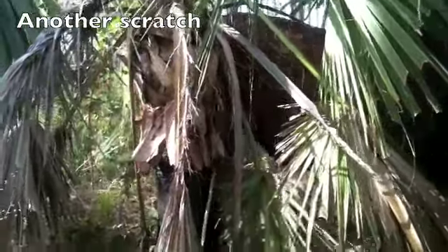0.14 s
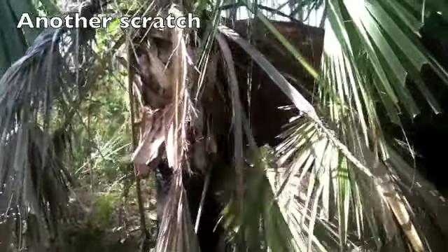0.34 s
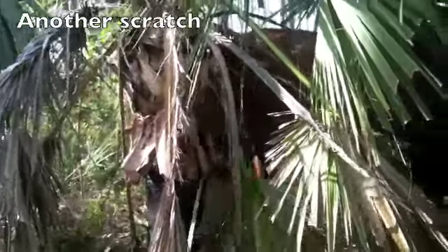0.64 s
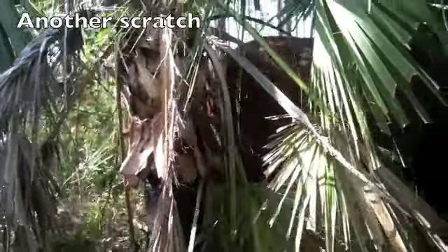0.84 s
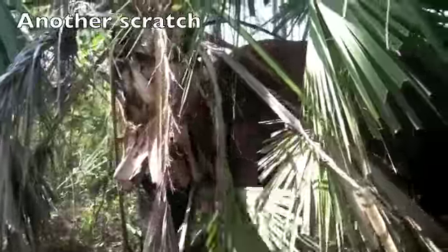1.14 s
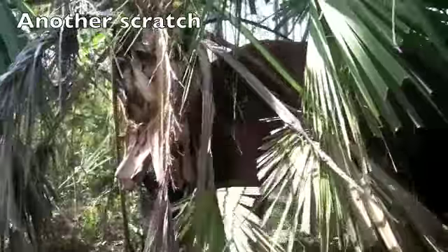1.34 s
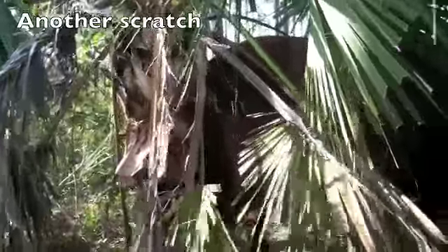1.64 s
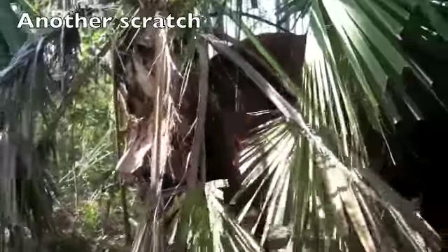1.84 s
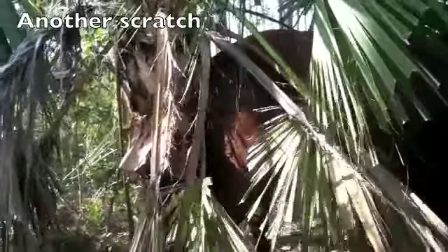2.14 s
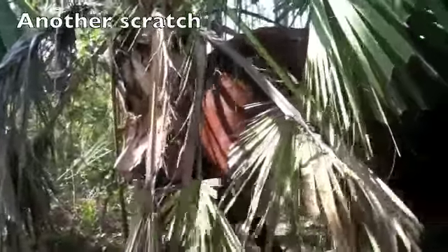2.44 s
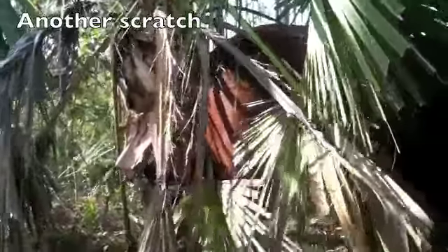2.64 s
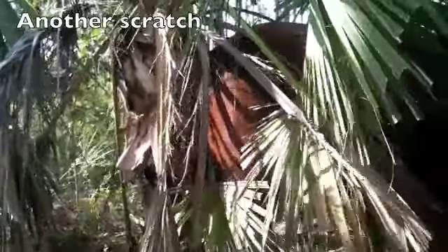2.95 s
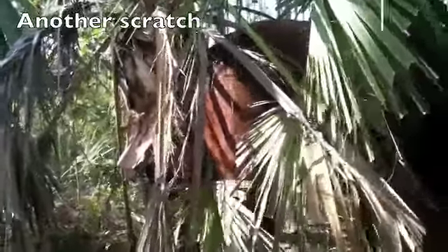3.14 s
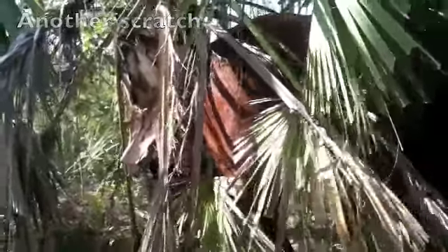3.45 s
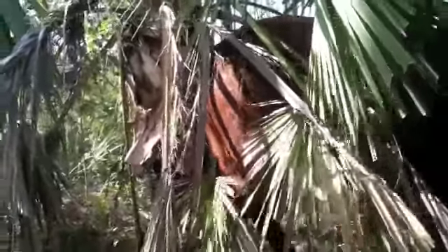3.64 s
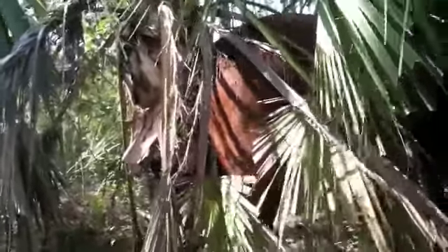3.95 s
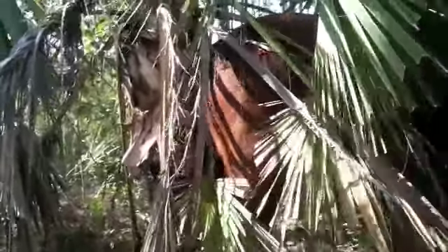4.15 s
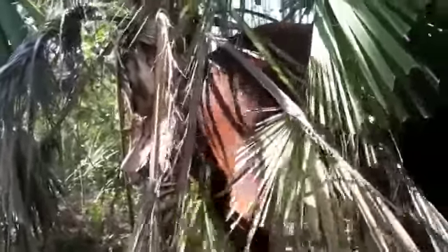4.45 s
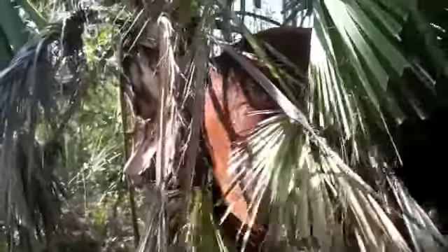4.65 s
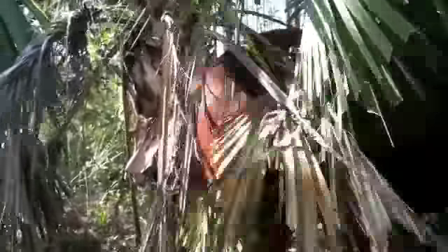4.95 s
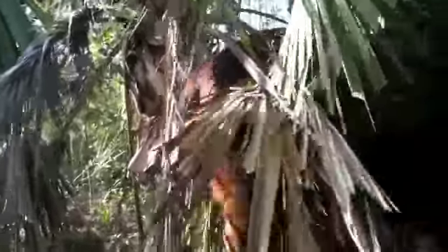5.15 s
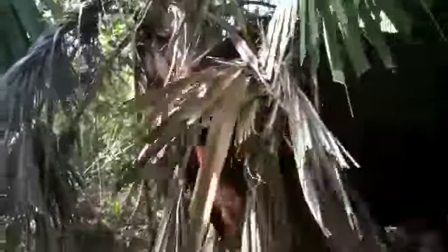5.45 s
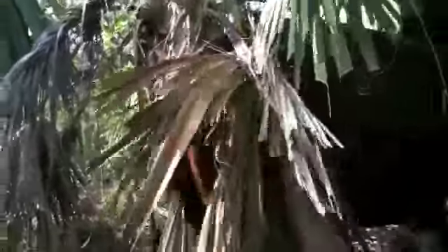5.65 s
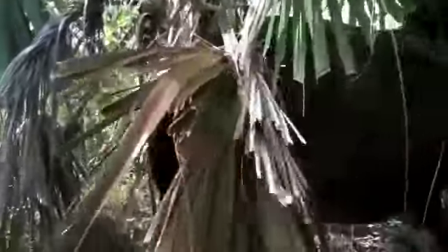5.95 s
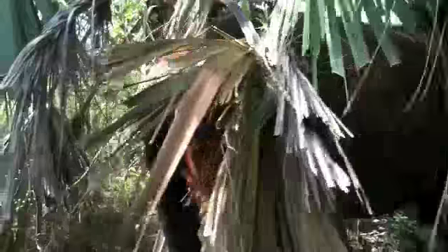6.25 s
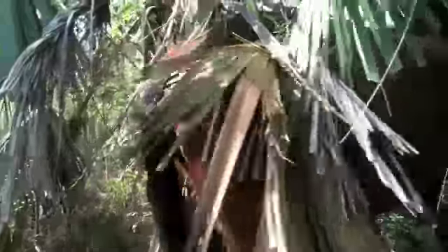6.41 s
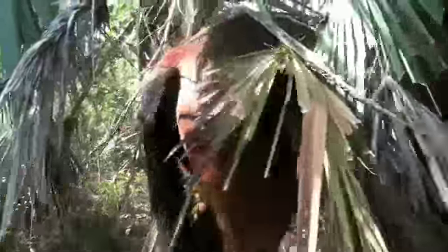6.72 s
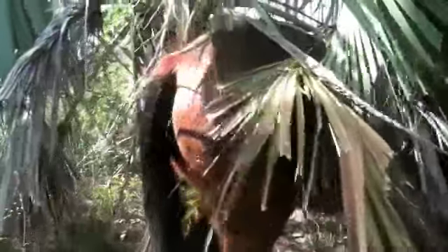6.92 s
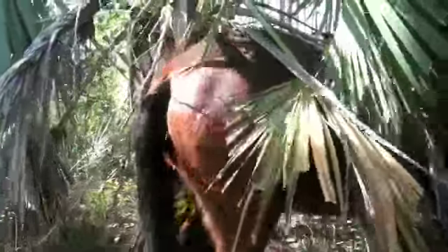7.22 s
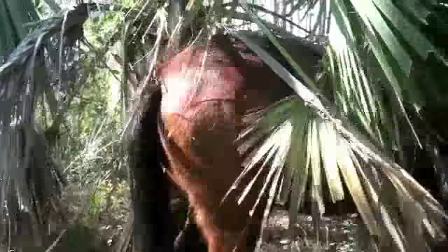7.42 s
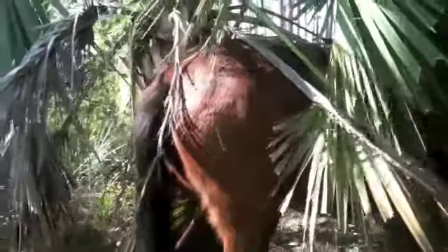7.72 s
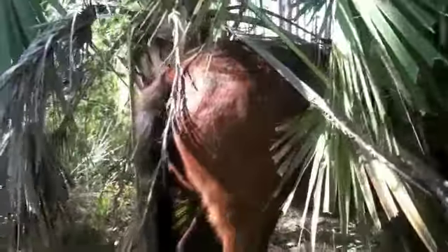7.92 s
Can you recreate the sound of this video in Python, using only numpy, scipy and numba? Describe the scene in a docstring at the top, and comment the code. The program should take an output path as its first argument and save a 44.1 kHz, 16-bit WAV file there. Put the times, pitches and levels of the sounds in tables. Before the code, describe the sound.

Crisp, bright rustling of dry palm leaves comes in repeated strokes, with sharp crackling snaps and a few faint hollow stalk knocks outdoors.

```python
"""In a wood, a few metres from a small camera microphone, a large animal rubs against dry palm fronds.
Stiff leaflets scrape and tick, and their ribs rasp lower: thousands of short ringing noise grains.
Single leaflets snap: a faint creak, a sharp break and a dying crackle.
Hollow stalks knock together: one dry tick, a low ring and a thud.
A faint woodland hush of filtered noise lies underneath."""
import sys
import numpy as np
from scipy import signal
from scipy.fft import rfft, irfft
from scipy.io import wavfile
from scipy.ndimage import uniform_filter1d
from numba import njit

SR = 44100
rng = np.random.default_rng(int(sys.argv[2]) if len(sys.argv) > 2 else 0)


def unload_audio(sound):
    """Save the sound as a 16-bit wav file, at the path given as the first command line argument."""
    columns = np.transpose(np.atleast_2d(sound))
    # keep every value between -1 and 1, then stretch to whole-number steps
    steps = np.round(np.clip(columns, -1, 1) * 32767)
    wavfile.write(sys.argv[1], SR, steps.astype(np.int16))


N = 356107  # length of the scene in samples
LEAD_S = 0.008  # a snap or knock burst starts this long before its strike


def undb(db):
    """Turn a level in dB into a gain."""
    return 10 ** (np.asarray(db) / 20)


def unit(x):
    """Scale a sound to rms 1."""
    return x / np.sqrt(np.mean(x ** 2))


def along(table):
    """Join each column of a table by straight lines in time; the first column is time in s."""
    time_s, *columns = np.transpose(table)
    t = np.arange(N) / SR
    return [np.interp(t, time_s, column) for column in columns]


def walk(rate_hz, size):
    """A random level that moves to a new value rate_hz times a second; its spread is near 1."""
    hold = max(int(SR / rate_hz), 1)
    steps = np.repeat(rng.standard_normal(size // hold + 1), hold)
    return 1.12 * uniform_filter1d(steps, hold)[:size]


def colour(x, points):
    """Filter a sound through (pitch_hz, gain_db) points, with no sound ahead of its cause."""
    pitch_hz, gain_db = np.transpose(points)
    size = 2048
    log_grid = np.log(np.arange(1, size // 2 + 2) * SR / size)
    log_gain = np.interp(log_grid, np.log(pitch_hz), gain_db) * np.log(10) / 20
    # folding the cepstrum of the log gain gives a filter that only looks back
    cepstrum = irfft(log_gain)
    cepstrum[1:size // 2] *= 2
    cepstrum[size // 2 + 1:] = 0
    response = irfft(np.exp(rfft(cepstrum)))
    return signal.fftconvolve(x, response)[:len(x)]


def low_pass(x, cutoff_hz):
    """Gently remove what lies above cutoff_hz."""
    return signal.sosfilt(signal.butter(1, cutoff_hz, fs=SR, output="sos"), x)


def band(x, centre_hz, octaves):
    """Keep a band reaching the given octaves either side of its centre, and scale it to peak 1."""
    edges = np.clip([centre_hz * 2 ** -octaves, centre_hz * 2 ** octaves], 20, 0.45 * SR)
    y = signal.sosfilt(signal.butter(1, edges, "band", fs=SR, output="sos"), x)
    return y / np.abs(y).max()


def band_twice(x, centre_hz, octaves):
    """Apply the same band two times for steeper sides."""
    return band(band(x, centre_hz, octaves), centre_hz, octaves)


def add(out, start_s, x):
    """Mix x into out from start_s."""
    i = int(start_s * SR)
    out[i:i + len(x)] += x[:max(N - i, 0)]


# Tone of the woodland hush: (pitch_hz, gain_db)
HUSH_TONE = [(24, -69), (40, -34), (291, -5), (439, -6), (886, -8.5), (1510, -13), (1920, -10.5),
             (3430, -18.5), (5850, -8.5), (13000, -18.5)]


def hush():
    """The quiet of the wood: steady coloured noise whose level drifts a little."""
    level_db = -59.5 + 1.6 * walk(6, N)
    return undb(level_db) * unit(colour(rng.standard_normal(N), HUSH_TONE))


def burst(fall_db, strike_db, chatter_db, chatter_rate_hz, creak_db):
    """A faint creak, a sharp strike, then noise dying by fall_db per 10 ms in uneven after-slips."""
    size = 4096
    t = np.arange(size) / SR - LEAD_S  # the strike is at 0 s
    # at least 2 dB per 10 ms; the creak swells 1.5 times as steeply as the noise dies
    fade_db = -100 * max(fall_db, 2) * np.abs(t) * np.where(t < 0, 1.5, 1)
    slips_db = fade_db + chatter_db * walk(chatter_rate_hz, size)
    strike = 1 + undb(strike_db) * np.exp(-np.abs(t) / 0.0018)
    shape = np.where(t < 0, undb(creak_db), strike)
    return rng.standard_normal(size) * undb(slips_db) * shape


# Stalks knocking together:
# (start_s, level_db, pitch_hz, fall_db per 10 ms, tick_db above the ring, thud_db above the ring)
STALK_KNOCKS = [(.122, -46, 840, 18, 6, -25), (.169, -37, 400, 8, -1, -33), (0.225, -39, 323, 11, 2, -28),
                (.371, -46.5, 200, 13.5, 13.5, -6), (.621, -36.5, 270, 7.5, 3, -11),
                (2.587, -48, 265, 4.5, 8, -28), (3.237, -39, 806, 4, -8, -30),
                (3.413, -38, 885, 9, -11, -29), (3.48, -51, 370, 9, -4, -9), (3.8, -47.5, 270, 3.5, 2, -10),
                (3.89, -53, 280, 9, 10, -22), (4.275, -51, 420, 7, 9, -12), (4.701, -49.5, 155, 10, 2, -12),
                (4.778, -40.5, 840, 1.5, 8, -11), (6.633, -41, 275, 4, 3, -18),
                (6.945, -41, 1190, 5, 17.5, -15), (7.749, -45, 724, 8, 2, -17)]


def knocks():
    """A hollow stalk rings low after one dry, woody tick; the trunk thuds beneath."""
    out = np.zeros(N)
    t = np.arange(4096) / SR
    pulse = np.exp(-(t / 0.00017 - 2) ** 2)
    tick = band(band(pulse, 960, 1.0), 930, 1.6)
    # the hollow takes a moment to speak
    swell = 1 - np.exp(-np.maximum(t - LEAD_S, 0) / 0.0028)
    for start_s, level_db, pitch_hz, fall_db, tick_db, thud_db in STALK_KNOCKS:
        blow = swell * burst(fall_db, strike_db=3.0, chatter_db=2.5, chatter_rate_hz=150, creak_db=-30)
        blow[int(LEAD_S * SR)] -= 10  # the blow itself sets the hollow going at once
        ring = band(band(blow, pitch_hz, 0.37), pitch_hz, 0.42)
        thud = band_twice(blow, 160, 0.38)
        add(out, start_s - LEAD_S, undb(level_db) * (ring + undb(thud_db) * thud))
        add(out, start_s, -undb(level_db + tick_db) * tick)
    return out


# Tone of the dry leaflets: (pitch_hz, gain_db)
LEAFLET_TONE = [(1530, -42.5), (2600, -16), (3260, -11), (5700, -0.5), (7950, 0), (9670, -4.5),
                (11700, -10), (15100, -26.5), (15800, -19.5)]


def leaflet_colour(x):
    """Stiff, thin leaflets pass on mostly treble."""
    return colour(x, LEAFLET_TONE)


# Loud leaflet snaps: (start_s, level_db, pitch_hz, fall_db per 10 ms,
#                      body_db of the dull body, creak_db of the creak before)
LEAFLET_SNAPS = [(0.1551, -20.5, 6260, 12, -11, -16), (0.222, -21, 7600, 12, -11, -12),
                 (0.5964, -23, 7400, 3.5, -24, -17), (0.617, -18, 7060, 8, -18, -10),
                 (0.645, -22, 6400, 0.5, -13, 0), (0.804, -26.5, 6040, 4, -13, -10),
                 (1.065, -28, 7500, 7.5, -4, -10), (1.133, -22.5, 5900, 0, -7, -4),
                 (1.352, -24, 6060, 1, -20, 2), (1.378, -21, 7600, 7, -20, -8),
                 (1.4878, -24, 6800, 11, -19, -14), (2.095, -32, 7000, 19, -20, -18),
                 (2.123, -28.5, 6040, 10, -17, -8), (2.19, -32, 7200, 9, -20, -18),
                 (2.2386, -25.5, 5500, 14, -11, 6), (2.4238, -25.5, 5530, 11, -21, -10),
                 (2.4758, -28, 4830, 13, -21, -12), (2.7156, -26, 7400, 2.5, -11.5, -7),
                 (2.781, -26.5, 6450, 1, -21, 1), (2.806, -19, 8000, 7, -15, -18),
                 (2.9414, -16.5, 6650, 8, -19, -8), (3.029, -34, 5640, 10, -19, -12),
                 (3.067, -25.5, 5400, 3, -16, -5), (3.145, -17.5, 5900, 9, -21, -22),
                 (3.176, -17, 5700, 0.5, -19, 1), (3.2353, -18, 6160, 0.5, -16.5, -2),
                 (3.26, -18, 5940, 11, -22, -10), (3.398, -21, 6050, 16, -17, -16),
                 (3.4158, -14, 6000, 21, -10.5, -12), (3.476, -24, 6360, 17, -17, -6),
                 (3.494, -26, 5000, 18, -16, -14), (3.612, -25, 6460, 5, -20, -10),
                 (4.272, -31, 5990, 4, -5, -14), (4.304, -27, 5280, 12, -14, -10),
                 (4.326, -18.5, 6040, 11, -23, -14), (4.35, -24.5, 7600, 1, -14, -16),
                 (4.577, -28, 6860, 14, -21, -10), (4.5891, -17, 6900, 11, -17, -7),
                 (4.783, -20, 6440, 4, -10.5, -12), (4.806, -22, 6300, 5, -20, -10),
                 (4.902, -16, 6100, 11, -12, -2), (4.9319, -23, 6790, 5.5, -15, -11),
                 (4.971, -37, 2540, 18, -6, -3), (5.148, -24, 6100, 20, -14, -12),
                 (5.21, -20, 7800, 15, -11.5, -14), (5.221, -18, 8850, 16, -15, -8),
                 (5.242, -17, 8400, 16, -18, -14), (5.266, -25.5, 8300, 14, -8, -12),
                 (5.284, -27, 8270, 16, -14, -4), (5.304, -29, 7000, 8, -3, -6),
                 (5.3298, -23, 6500, 15, -19, -8), (5.358, -25.5, 2450, 13, -16, -22),
                 (5.376, -21.5, 8450, 19, -14, -6), (5.401, -25, 6600, 8, -8.5, -12),
                 (5.5209, -15, 4980, 13, -17.5, -16), (5.552, -24, 4810, 10, -13, -8),
                 (5.58, -21.5, 8040, 13, -16, -16), (5.597, -24, 5800, 12, -18, -8),
                 (5.613, -22, 2150, 10, -14, -18), (5.623, -20.5, 8000, 7, -11, -2),
                 (5.6555, -12, 7800, 28, -12.5, -26), (5.689, -25, 2540, 9, -13, 0),
                 (5.753, -20.5, 6540, 12, -15, -14), (5.7593, -14, 5130, 18, -19, -2),
                 (5.77, -23.5, 6500, 21, -13, -12), (5.9656, -12.5, 4620, 22, -20, -26),
                 (5.974, -18.5, 4600, 10, -12, -20), (5.979, -26.5, 3360, 12, -10, -20),
                 (6.161, -31.5, 6230, 16, -10, -12), (6.197, -30, 7360, 3.5, -21, 0),
                 (6.226, -35, 7500, 12, -1.5, -12), (6.26, -27.5, 4570, 5, -6.5, 0),
                 (6.3184, -21, 7160, 15, -13, -20), (6.37, -29, 7050, 5, -17, -10),
                 (6.576, -17, 5000, 12, -17.5, -13), (6.59, -30, 4300, 14, -17, -4),
                 (6.614, -22, 6230, 12, -7, -13), (6.662, -24.5, 7000, 10, -11, -3),
                 (6.676, -27, 5440, 17, -4.5, -8), (6.696, -29, 5500, 13, -9, -8),
                 (6.744, -30, 7350, 12, -18, -11), (6.7998, -17, 4520, 14, -20, -5),
                 (6.822, -21.5, 9300, 18, -16, -14), (6.835, -21, 4700, 5, -9, -1),
                 (6.859, -23.5, 6300, 14, -12, -5), (6.928, -21.5, 5090, 14, -13, -5),
                 (6.9446, -24, 5080, 9, -4.5, -12), (6.998, -26.5, 7500, -1, -5.5, -2),
                 (7.014, -27, 6200, 10.5, -12, -12), (7.0367, -22.5, 5200, 10, -10, -12),
                 (7.087, -27, 6500, 16, -6, 0), (7.1203, -20.5, 6000, 13, -9, 7),
                 (7.156, -29, 7900, 6, -7, -8), (7.175, -18, 7750, 4, -11.5, -1),
                 (7.193, -22, 7500, 14, -13, -10), (7.2454, -11.5, 7600, 6.5, -11, -18),
                 (7.322, -18, 8240, 4, -8, -12), (7.337, -24.5, 2800, 4, -7, -8),
                 (7.4087, -17, 5670, 9, -9, -13), (7.435, -19.5, 6030, 17, -11, -1),
                 (7.488, -27, 7800, 12, -22, -8), (7.5106, -23.5, 7600, 3, -11.5, -10),
                 (7.637, -24, 5100, 20, -5.5, -7), (7.695, -23, 6750, 2.5, -10, -17),
                 (7.75, -19, 7200, 9, -6.5, -7), (7.8503, -27, 5400, 20, -7.5, -12),
                 (7.9078, -27.5, 5700, 14, -12, -12), (7.952, -28.5, 6700, 8, -10, -4)]


def snaps():
    """A bent leaflet creaks, then lets go: its own ring, a broad crackle, a dull body, a brittle top."""
    out = np.zeros(N)
    for start_s, level_db, pitch_hz, fall_db, body_db, creak_db in LEAFLET_SNAPS:
        crack = burst(fall_db, strike_db=3.5, chatter_db=2.0, chatter_rate_hz=572, creak_db=creak_db)
        # a leaflet that creaks little breaks hard
        crack[int(LEAD_S * SR)] += 1.7 * undb(-0.35 * (creak_db + 17))
        ring = band(band(crack, pitch_hz, 0.14), pitch_hz, 0.74)
        crackle = band(leaflet_colour(crack), 6800, 0.78)
        body = band_twice(crack, 2410, 0.81)
        brittle = band_twice(crack, 10950, 0.35)
        snap = 0.71 * ring + 0.57 * crackle + undb(body_db) * body + undb(-21) * brittle
        add(out, start_s - LEAD_S, undb(level_db) * snap)
    return out


@njit
def grains(at, size, hz, sharp, t60_s, noise):
    """Each grain is a dying burst of noise through its own resonance."""
    out = np.zeros(len(noise))
    for j in range(len(at)):
        tuning = np.tan(np.pi * hz[j] / SR)
        damping = 1 / sharp
        fall = np.exp(-np.log(1000) / (t60_s[j] * SR))
        band_state, low_state, force = 0., 0., size[j]
        # stop once the noise has fallen by 36 dB
        stop = min(len(out), at[j] + int(t60_s[j] * SR * .6))
        for i in range(at[j], stop):
            push = force * noise[i - j] - low_state
            ring = (band_state + tuning * push) / (1 + tuning * (tuning + damping))
            band_state = 2 * ring - band_state
            low_state += 2 * tuning * ring
            force *= fall
            out[i] += ring * np.sqrt(damping / tuning)
    return out


def scrape(low_hz, high_hz, sharp, base_t60_s, spread_db, grip, count):
    """Slips between surfaces: many small, a few large, stronger or weaker as the grip changes."""
    when, big, pitch, length = rng.random((count, 4)).T
    at = (when * N).astype(np.int64)
    size = undb(-spread_db * np.log(1 - 0.995 * big)) * grip[at]
    hz = low_hz + (high_hz - low_hz) * pitch
    t60_s = base_t60_s * (1.34 + 1.83 * length)
    return grains(at, size, hz, sharp, t60_s, rng.standard_normal(N))


# Edge ticks grow stronger as drier leaflets join in: (start_s, level_db against the leaflet scrape)
EDGE_TICKS = [(.8, -11.5), (4.6, -9)]


def leaflets(grip, treble_db):
    """Leaflets scrape in dense grains; their brittle edges add sparse, very short ticks."""
    leaf = unit(leaflet_colour(scrape(2590.0, 14400.0, 2.54, 0.014, 2.42, grip, count=20000)))
    ticks = unit(leaflet_colour(scrape(4400.0, 15800.0, 2.1, 0.004, 3.9, grip, count=3000)))
    dull = low_pass(leaf, 10000)
    tick_db, = along(EDGE_TICKS)
    return dull + undb(treble_db) * (leaf - dull) + undb(tick_db) * ticks


# Tone of the leaflet ribs: (pitch_hz, gain_db)
RIB_TONE = [(35, -59), (60, -34), (265, -7.5), (348, -5), (398, -10.5), (895, -4), (1560, -4.5),
            (2430, -2.5), (3070, -5), (3400, -6.5), (4420, -2.5), (7480, -120)]


def ribs(grip, rib_db):
    """Ribs rasp lower; the heavy stalks answer a hard stroke less than the light ribs do."""
    rib = unit(colour(scrape(63.0, 3640.0, 2.26, 0.029, 3.25, grip, count=16000), RIB_TONE))
    stalk = low_pass(rib, 700)
    return rib - stalk + undb(-0.3 * (rib_db + 45.5)) * stalk


# Strokes of the flank along the fronds:
# (start_s of full pressure, held_s, first_db of the leaflets on arrival, last_db on leaving)
FLANK_STROKES = [(0.0, 0.455, -42.5, -39), (0.48, 0.23, -39.5, -43.5), (1.1, 0.21, -35, -40.5),
                 (1.345, 0.07, -38, -33.5), (1.41, 0.14, -37, -38.5), (1.69, 0.048, -43, -46.5),
                 (2.25, 0.18, -43.5, -42), (2.55, .24, -43, -44.5), (3.15, 0.26, -37, -33),
                 (3.59, .02, -40.5, -42), (3.68, 0.13, -45.5, -44.5), (4.11, .04, -45, -45),
                 (4.33, .08, -38, -40), (4.435, 0.04, -37.5, -32), (4.49, 0.032, -34, -35.5),
                 (4.55, 0.24, -39.5, -46.5), (4.8, .32, -35, -38), (5.18, 0.21, -38, -39),
                 (5.45, 0.089, -38, -40.5), (5.61, 0.074, -35.5, -33.5), (5.73, 0.032, -37, -40),
                 (6.21, 0.035, -45, -46), (6.32, 0.11, -46, -45), (6.51, 0.27, -38.5, -35.5),
                 (6.83, .33, -40, -39.5), (7.2, 0.14, -38, -30.5), (7.37, 0.13, -34.5, -40),
                 (7.54, 0.1, -41.5, -44), (7.71, 0.047, -40, -43.5), (7.93, .04, -46.5, -47.5)]


def stroke_level_db():
    """Each stroke bites, drags and eases off; the strongest at any moment sets the rustle."""
    press_db_per_s, ease_db_per_s, rest_db = 110, 117, -50.5
    t = np.arange(N) / SR
    out = np.full(N, rest_db)
    for start_s, held_s, first_db, last_db in FLANK_STROKES:
        end_s = start_s + held_s
        drag = np.interp(t, [start_s, end_s], [first_db, last_db])
        bite = press_db_per_s * np.maximum(start_s - t, 0)
        ease = ease_db_per_s * np.maximum(t - end_s, 0)
        out = np.maximum(out, drag - bite - ease)
    return out


# Changing colour of the rustle: (start_s, rib_db above the leaflets, treble_db of the leaflets' top)
RUSTLE_COLOUR = [(0, -13.5, -1), (.45, -9.5, 1), (.9, -5, 12), (1.1, -10.5, -2), (1.45, -11.5, 2),
                 (2.1, -10, -10), (2.55, -9.5, 7), (3.0, -13.5, -11), (3.3, -13, 1), (3.9, -16, -5.5),
                 (4.45, -9, 0), (5.2, -12.5, -1), (5.62, -13, 2), (6.25, -7.5, 4.5), (6.65, -15, -6),
                 (7.3, -7.5, 2), (7.6, -10, 4), (8.07, -10.5, 6.5)]


def rustle():
    """The flank drags leaflets and ribs with one changing grip; some strokes brighten the leaflets."""
    leaf_db = stroke_level_db()
    rib_above_leaf_db, treble_db = along(RUSTLE_COLOUR)
    rib_db = leaf_db + rib_above_leaf_db
    grip = undb(0.13 * walk(11, N) + 1.2 * walk(110, N))
    return undb(leaf_db) * leaflets(grip, treble_db) + undb(rib_db) * ribs(grip, rib_db)


def scene():
    """The hush of the wood, knocking stalks, snapping leaflets and the rubbed fronds together."""
    return (hush() + knocks() + snaps() + rustle())[None]


# Tone of the small microphone: (pitch_hz, gain_db)
MIC_TONE = [(30, 19), (70, -2), (130, 0), (1900, -1.5), (2400, 2.5), (3200, -1), (4200, 1), (12000, -3),
            (15800, -8.5)]


def record(dry):
    """The small microphone colours the sound; the recorder cuts the top above 15750 Hz."""
    heard = colour(dry[0], MIC_TONE)[None]
    top_cut = signal.ellip(10, 0.2, 70, 15750, fs=SR, output="sos")
    return signal.sosfilt(top_cut, heard)


dry = scene()
out = record(dry)
unload_audio(out)
```